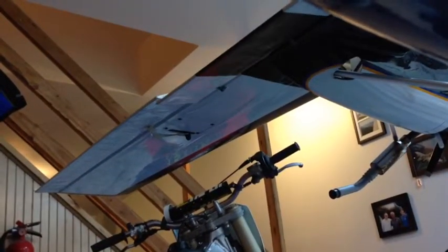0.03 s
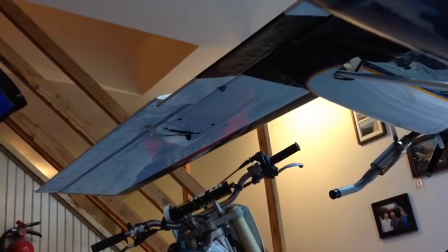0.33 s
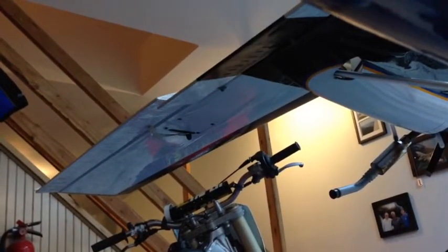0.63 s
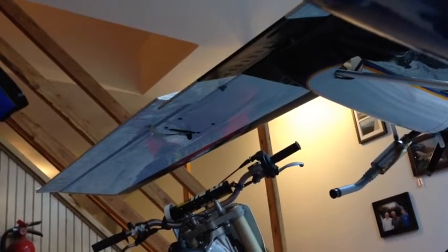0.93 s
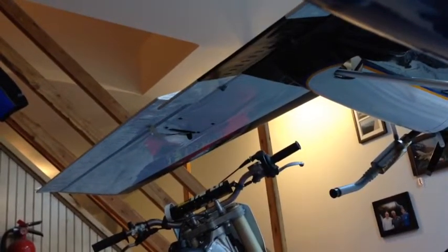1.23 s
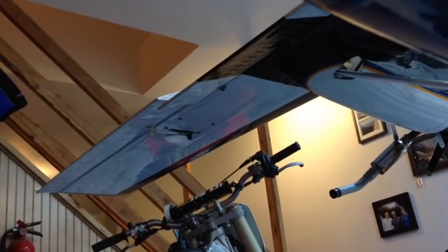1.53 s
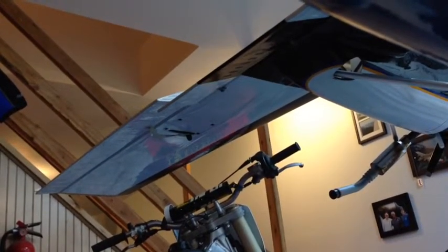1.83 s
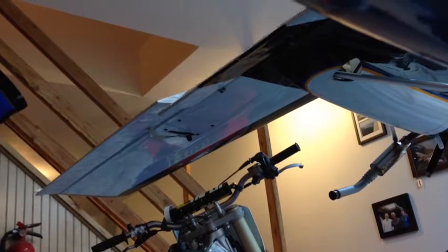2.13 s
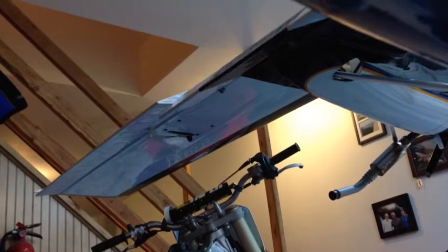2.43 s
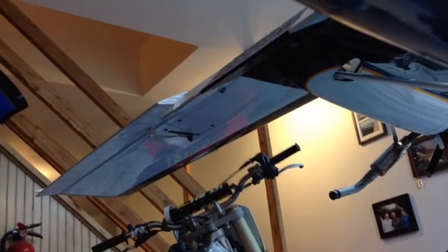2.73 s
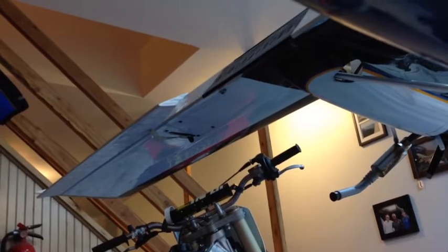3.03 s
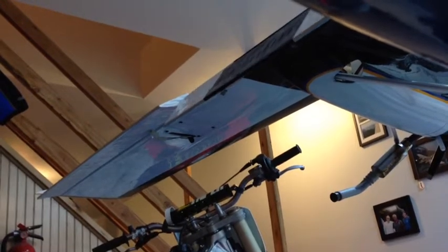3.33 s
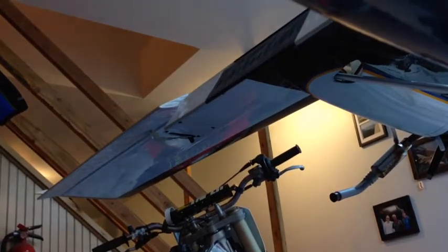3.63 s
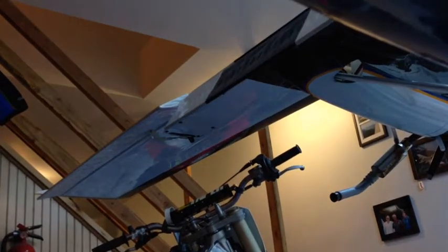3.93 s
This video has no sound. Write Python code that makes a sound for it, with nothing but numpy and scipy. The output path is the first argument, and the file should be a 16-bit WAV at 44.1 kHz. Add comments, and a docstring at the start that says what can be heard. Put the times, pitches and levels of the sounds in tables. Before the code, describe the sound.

Small servos buzz, tick and grind, pause, then run longer in a quiet room.

```python
"""Over a quiet room's rumble, hiss and mains hum, small servos move a flap on a model plane's wing.
The radio kicks each motor once per control frame: the hollow wing drums and drones, the gears rattle,
a servo holding its load hums and ticks, some ticks ringing out, the hinge clicks and slack knocks.
After a pause a tooth bites and a longer run follows, with one low bump as the wing gives.
The flap stops, and the holding servo buzzes on."""
import sys
import numpy as np
from scipy import signal
from scipy.fft import rfft, irfft, next_fast_len
from scipy.io import wavfile
from scipy.ndimage import map_coordinates

SR = 44100
rng = np.random.default_rng(int(sys.argv[2]) if len(sys.argv) > 2 else 0)


def wav_record(signal):
    """Record a signal, one row per channel, as 16-bit PCM in the file named by sys.argv[1]."""
    frames = np.transpose(np.atleast_2d(signal))
    bounded = np.clip(frames, -1, 1)
    # unit amplitude maps onto the largest positive 16-bit level
    quanta = np.round(bounded * 32767).astype(np.int16)
    wavfile.write(sys.argv[1], SR, quanta)


N = 176400
FRAME_S = .022  # the radio's control frame

# body of the hollow wing: f/Hz, level/dB
WING_BODY = [(30, -49.5), (100, -21.5), (160, -14.5), (205, -2), (250, -1.5), (285, -7.5), (330, -1.5),
             (400, -6.5), (480, -12.5), (650, -27.5), (1000, -25.5), (3000, -84.5)]
# tone of a short scrape: f/Hz, level/dB
SCRAPE_TONE = [(200, -26), (700, 10.5), (1500, 15), (2400, -8), (3700, 2.5), (5500, -14.5), (14000, -33)]


def amp(db):
    """Decibels to gain."""
    return 10 ** (np.asarray(db) / 20)


def unit(x):
    """Scale to rms 1."""
    return x / np.sqrt(np.mean(x ** 2) + 1e-20)


def along(points, hz):
    """Read a curve of (f/Hz, value) points on a log frequency axis."""
    f, values = np.transpose(points)
    return np.interp(np.log(hz + 1), np.log(f + 1), values)


def clock():
    """Time of each sample in seconds."""
    return np.arange(N) / SR


def wobble(rate):
    """A smooth random curve, rate knots a second."""
    return map_coordinates(rng.standard_normal(1024), [clock() * rate], mode="wrap")


def colour(x, spectrum, size=8192):
    """Minimum-phase EQ through (f/Hz, level/dB) points."""
    cepstrum = irfft(np.log(amp(along(spectrum, np.fft.rfftfreq(size, 1 / SR)))))
    cepstrum[1:size // 2] *= 2
    cepstrum[size // 2 + 1:] = 0
    return signal.fftconvolve(x, irfft(np.exp(rfft(cepstrum))))[:len(x)]


def add(track, s, sound):
    """Mix a sound in at time s."""
    i = max(0, round(s * SR))
    track[i:i + len(sound)] += sound[:max(0, N - i)]


def contact(t60, hard, size=4096):
    """A hard first impact and a short rattle after it."""
    t = np.arange(size) / SR
    rattle = rng.standard_normal(size) * amp(-60 * t / t60)
    return rattle / np.linalg.norm(rattle) + hard * (t == 0)


def blow(spectrum, t60, hard):
    """One contact heard through a body, scaled to peak 1."""
    sound = colour(contact(t60, hard), spectrum)
    return sound / abs(sound).max()


def kicks(slots, t60, hard, scatter_db, jitter_s):
    """One contact per frame in every (t/s, level/dB) slot, each of its own strength."""
    track = np.zeros(N)
    for slot, db in slots:
        for frame in np.arange(0, N / SR, FRAME_S):
            onset = frame + slot + jitter_s * rng.normal()
            strength = amp(db + scatter_db * np.clip(rng.normal(), -2, 2))
            add(track, onset, strength * contact(t60, hard))
    return track


def partials(levels, first, waver_db, smear, rate):
    """Unsteady partials at rms 1, on multiples of half the frame rate from the first given upward."""
    base_phase = np.pi * clock() / FRAME_S
    tone = np.zeros(N)
    for k, db in enumerate(levels, first):
        gain = amp(db + waver_db * wobble(rate))
        tone += gain * np.sin(k * base_phase + smear * wobble(rate) + 2 * np.pi * rng.random())
    return unit(tone)


def tooth_ring(hz, t60=.016, size=2048):
    """A tooth's brief, rough ring, with a soft attack."""
    t = np.arange(size) / SR
    roughness = .12 * np.cumsum(rng.standard_normal(size))
    return np.sin(2 * np.pi * hz * t + roughness) * amp(-60 * t / t60) * (1 - np.exp(-t / .0022))


def effort(ramp_s=.048):
    """Two envelopes, for wing and gears, open while the flap travels."""
    # one list per run: t/s, wing level/dB, gear level/dB
    runs = [
        [(0, -50.5, -60), (.13, -47.5, -58), (.19, -51.5, -59.5), (.25, -51, -57), (.3, -55.5, -60.5),
         (.4, -53, -60.5), (.45, -51, -60), (.52, -55, -59), (.62, -51.5, -59), (.73, -49.5, -59.5),
         (.84, -62, -60.5)],
        [(1.725, -55, -56.5), (1.79, -45, -57), (1.93, -45.5, -60), (2.1, -51.5, -59), (2.21, -49.5, -60.5),
         (2.32, -53, -54.5), (2.4, -47, -61), (2.56, -49.5, -56), (2.68, -51.5, -59.5), (2.77, -49, -63),
         (2.83, -49, -58), (2.96, -51.5, -57.5), (3.06, -52, -59.5), (3.17, -52.5, -56.5), (3.3, -51, -61.5),
         (3.55, -52, -56.5), (3.73, -48, -57), (3.81, -53.5, -61)],
    ]
    t, gains = clock(), np.zeros((2, N))
    for run in runs:
        times, *levels = np.transpose(run)
        gate = np.clip(1 + np.minimum(t - times[0], times[-1] - t) / ramp_s, 0, 1)
        gains += [gate * amp(np.interp(t, times, db)) for db in levels]
    return gains


def room_tone():
    """A bed of rumble, hiss and faintly wavering mains hum."""
    # rumble and hiss: f/Hz, level/dB
    air = [(15, -61), (28, -21), (42, -1), (65, -1), (90, -8.5), (125, -2), (160, -9.5), (200, -12),
           (340, -13.5), (600, -20), (1300, -26.5), (2000, -26), (3000, -21.5), (4400, -21.5),
           (8000, -23.5), (15000, -24.5)]
    # hum partials: f/Hz, level/dB
    mains = [(59.5, -80.5), (119.5, -72.5)]
    hum = np.zeros(N)
    for hz, db in mains:
        peak = np.sqrt(2) * amp(db + .67 * wobble(7))
        hum += peak * np.sin(2 * np.pi * hz * clock() + .41 * wobble(3.2))
    return amp(-63) * unit(colour(rng.standard_normal(N), air)) + hum


def wing_drone():
    """The hollow wing drones on multiples of half the frame rate."""
    # partials 8 to 20: level/dB
    levels = [-16.5, 1, -11, -16.5, -17.5, -9, -14, -6, -4.5, -5.5, -15, -18.5, -16]
    wing_gain, _ = effort()
    return wing_gain * amp(-2.5) * partials(levels, first=8, waver_db=1.5, smear=.35, rate=13)


def driving_servos():
    """Each motor kick thumps the wing and rattles the gears; gears and linkage grind in uneven swells."""
    # motor kicks within a frame: t/s, level/dB
    slots = [(.0055, 0.5), (.0118, -5), (.0155, -2), (0.00262, -2.5), (.019, -3.5)]
    # gear chatter: f/Hz, level/dB
    gear_tone = [(100, -24.5), (350, 0), (560, 1.5), (680, -2.5), (790, 2.5), (930, 2), (1030, -5),
                 (1230, -3.5), (1520, -7), (1750, -18.5), (1880, -8), (2300, -11.5), (3200, -21.5),
                 (4500, -20), (8000, -35), (15000, -37)]
    # linkage rasp: f/Hz, level/dB
    rasp_tone = [(100, -43), (700, -27), (1050, -5.5), (1220, 0.5), (1400, -0.5), (1530, 0), (1640, -13.5),
                 (1750, -5), (1880, -41.5), (2300, -34), (8000, -55.5)]
    wing_gain, gear_gain = effort()
    wing_hits = kicks(slots, t60=.017, hard=.43, scatter_db=3.5, jitter_s=.00061)
    thumps = unit(colour(wing_hits, WING_BODY))
    swell = amp(1.1 * np.clip(wobble(38), -2, 1.5))
    gear_hits = kicks(slots, t60=.028, hard=.32, scatter_db=2, jitter_s=.0004)
    chatter = unit(swell * colour(gear_hits, gear_tone))
    rasp_swell = swell * amp(wobble(21.79))
    rasp_hits = kicks(slots, t60=.019, hard=.59, scatter_db=5, jitter_s=.00043)
    rasp = unit(rasp_swell * colour(rasp_hits, rasp_tone))
    return wing_gain * amp(-7.7) * thumps + gear_gain * (amp(-1) * chatter + rasp)


def holding_servo(slot_s=.0032, tick_hz=2534, scatter_db=3):
    """A loaded servo hums, whines and ticks in its case once a frame, each tick at its own pitch."""
    # the servo's envelope: t/s, level/dB
    envelope = [(0, -62.5), (.3, -63), (.62, -62), (.8, -80), (.95, -100), (1.66, -100), (1.76, -68),
                (1.92, -64.5), (2.15, -64), (2.55, -61.5), (2.68, -73.5), (2.86, -58.5), (2.98, -87),
                (3.08, -61.5), (3.5, -60), (3.8, -64), (3.87, -62), (4, -62)]
    # body of its case: f/Hz, level/dB
    case_body = [(100, -54), (280, -18), (390, -15), (480, 11), (700, -3), (920, 5.5), (1070, -3),
                 (1250, -15), (1500, -4), (1950, -2.5), (2370, 1), (2750, -12), (3300, -3.5), (4500, -15.5),
                 (8000, -24.5), (15000, -34)]
    # hum partials 13 to 19: level/dB
    hum_levels = [-0.5, -10.5, -3, -10, -0.5, -5.5, -6.5]
    # whine partials 41 to 47: level/dB
    whine_levels = [-6, 0, -6, -7, 0, 5, 8]
    gain = amp(np.interp(clock(), *np.transpose(envelope)))
    ticks = kicks([(slot_s, 0)], t60=.022, hard=.08, scatter_db=scatter_db, jitter_s=.00022)
    case = unit(colour(ticks, case_body))
    teeth = np.zeros(N)
    for s in np.arange(slot_s, N / SR, FRAME_S):
        strength = amp(scatter_db * np.clip(rng.normal(), -2, 1))
        add(teeth, s, strength * tooth_ring(tick_hz * np.exp(.13 * rng.normal())))
    hum = partials(hum_levels, first=13, waver_db=4, smear=.85, rate=20)
    whine = partials(whine_levels, first=41, waver_db=5, smear=2.2, rate=40)
    return gain * (amp(-5.5) * case + amp(-8.5) * unit(teeth) + amp(-1) * hum + amp(-9) * whine)


def loud_servo_ticks(case_hz=3035):
    """The holding servo's loudest ringing ticks; the case rings along."""
    # loud ticks: t/s, relative level/dB, ring f/Hz
    ticks = [(0.0243, -48, 2310), (0.0468, -50, 2350), (0.0902, -50, 2100), (0.1126, -47, 2370),
             (0.2882, -51, 2830), (0.3187, -48, 2260), (0.3546, -45, 3050), (0.4199, -49, 2400),
             (0.4424, -52, 2250), (0.4858, -48, 2040), (0.6843, -51, 2340), (0.8819, -51, 3110),
             (1.7399, -45, 2500), (1.8063, -44, 2360), (1.8946, -44, 2210), (1.916, -46, 2070),
             (1.939, -43, 2340), (2.0263, -49, 1980), (2.0487, -44, 2680), (2.0926, -44, 2350),
             (2.1799, -49, 2240), (2.2238, -49, 2000), (2.2468, -45, 2170), (2.2907, -47, 2230),
             (2.378, -50, 3180), (2.4309, -48, 2410), (2.4887, -47, 2360), (2.5321, -51, 2830),
             (2.5985, -45, 2440), (2.7392, -47, 1950), (2.7746, -48, 2020), (2.818, -49, 2220),
             (2.8409, -46, 2170), (2.9068, -48, 2360), (3.0609, -44, 2870), (3.1487, -47, 2450),
             (3.237, -49, 2450), (3.4351, -44, 2360), (3.4645, -50, 1980), (3.4999, -49, 2330),
             (3.5882, -49, 2450), (3.6765, -48, 2430), (3.7429, -48, 2680), (3.8531, -49, 2400),
             (3.897, -50, 2380), (3.9409, -50, 2350)]
    track = np.zeros(N)
    for s, db, hz in ticks:
        ring = tooth_ring(hz) + amp(-8) * tooth_ring(case_hz * np.exp(.1 * rng.normal()))
        add(track, s, amp(db - 2.7) * ring / abs(ring).max())
        add(track, s, amp(db - 5.5) * blow(SCRAPE_TONE, t60=.025, hard=.17))
    return track


def hinge_clicks():
    """The flap's hinge gives thin, bright clicks."""
    # clicks: t/s, relative level/dB
    clicks = [(0.1431, -55), (1.6242, -54), (2.9587, -57), (3.3553, -51), (3.7514, -56)]
    # tone of the hinge: f/Hz, level/dB
    hinge_tone = [(500, -32), (2500, -12), (4000, 1), (5500, 3), (6500, 4), (7700, 6), (10000, -4),
                  (15000, -22)]
    track = np.zeros(N)
    for s, db in clicks:
        add(track, s, amp(db - 1) * blow(hinge_tone, t60=.04, hard=.15))
    return track


def slack_knocks():
    """Slack in gears and linkage takes up with a knock, and each knock comes with a soft, even thump of the
    wing."""
    # knocks: t/s, relative level/dB
    knocks = [(0.18, -43), (0.29, -43), (0.319, -44), (0.378, -41), (0.408, -43), (0.487, -41),
              (0.797, -42.5), (0.825, -45.5), (0.875, -55), (0.913, -52), (1.683, -48), (1.727, -44),
              (1.739, -42), (2.012, -42), (2.138, -43), (2.226, -43), (2.299, -36), (2.322, -44),
              (2.342, -43), (2.431, -38), (2.487, -42), (2.579, -43), (2.74, -38), (2.774, -43),
              (2.908, -43), (2.959, -43), (3.047, -43), (3.157, -42), (3.2, -42), (3.282, -42),
              (3.335, -42), (3.356, -39), (3.434, -48), (3.509, -44), (3.686, -45), (3.722, -41),
              (3.752, -43), (3.81, -44)]
    # body of the linkage: f/Hz, level/dB
    linkage_body = [(80, -20), (300, 5.5), (650, -21), (950, -1.5), (1120, -7), (1270, 2), (1550, -0.5),
                    (1950, -16), (3000, -18), (5000, -29), (14000, -76)]
    track = np.zeros(N)
    for s, db in knocks:
        add(track, s, amp(db + .5) * blow(linkage_body, t60=.055, hard=.08))
        add(track, s, amp(-45.5) * blow(WING_BODY, t60=.028, hard=1))
    return track


def gear_bite(at_s=1.6248, t60=.18):
    """Ahead of the second run a tooth bites, scrapes briefly and nudges the wing."""
    track, ring = np.zeros(N), tooth_ring(hz=2040)
    add(track, at_s, amp(-44) * ring / abs(ring).max())
    add(track, at_s, amp(-53) * blow(SCRAPE_TONE, t60, hard=.16))
    add(track, at_s, amp(-57) * blow(WING_BODY, t60, hard=.27))
    return track


def wing_flex(at_s=2.82, hz=123.6, t60=.12):
    """The wing gives under the flap's load with one soft, low bump."""
    track, t = np.zeros(N), np.arange(SR // 4) / SR
    envelope = amp(-44.5 - 60 * t / t60) * (1 - np.exp(-t / .0047))
    add(track, at_s, envelope * np.sin(2 * np.pi * hz * t))
    return track


def reverb(x):
    """The room's short tail, dying fastest in the mids."""
    # room decay: f/Hz, t60/s
    decay = [(150, 0.38), (1000, 0.086), (4000, 0.36), (12000, 0.19)]
    hz, t, noise = signal.stft(rng.standard_normal(SR // 2), SR, nperseg=256)
    tail = signal.istft(noise * amp(-60 * t / along(decay, hz)[:, None]), SR, nperseg=256)[1]
    predelayed = np.pad(x, (SR // 200, 0))
    return signal.fftconvolve(predelayed, tail / np.linalg.norm(tail))[:N]


def scene():
    """Mono mix: the mechanism feeds the reverb, while the wing's drone and bump stay dry."""
    rattle = driving_servos() + holding_servo()
    rattle += slack_knocks() + loud_servo_ticks() + hinge_clicks() + gear_bite()
    return (wing_drone() + wing_flex() + rattle + amp(-7) * reverb(rattle) + room_tone())[None]


def record(dry, top_hz=15400):
    """A brick-wall high cut."""
    size = next_fast_len(N + SR // 2)
    passband = np.fft.rfftfreq(size, 1 / SR) < top_hz
    return irfft(rfft(dry, size) * passband, size)[..., :N]


dry = scene()
out = record(dry)
wav_record(out)
```